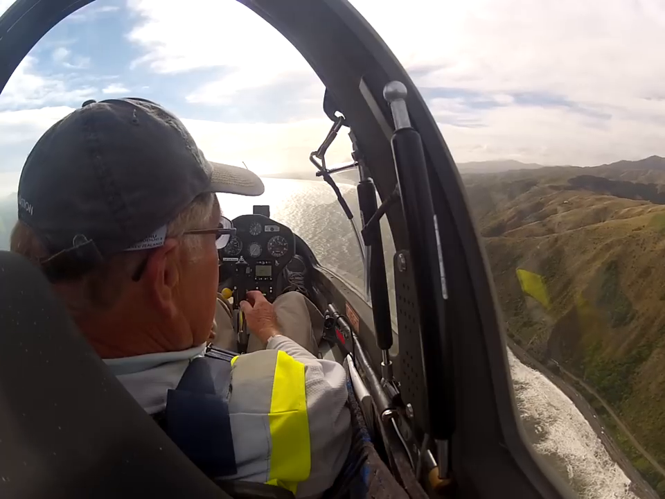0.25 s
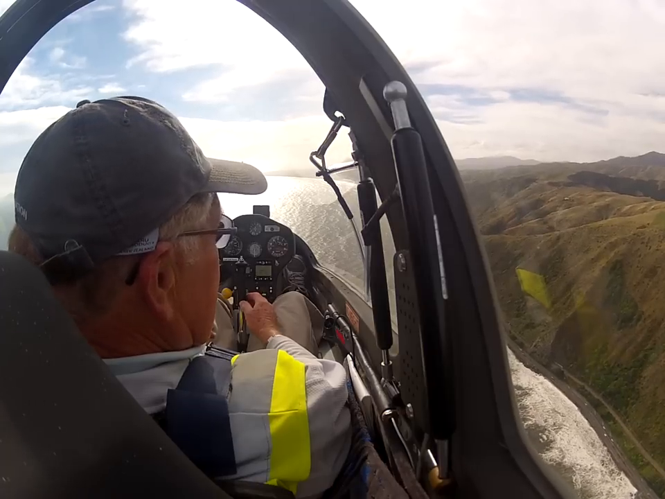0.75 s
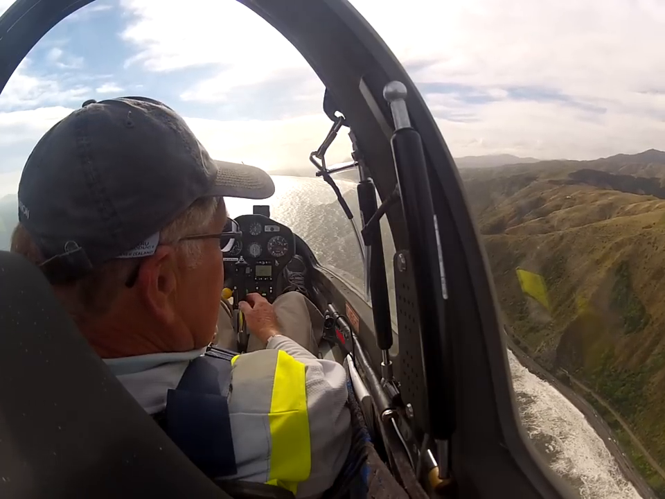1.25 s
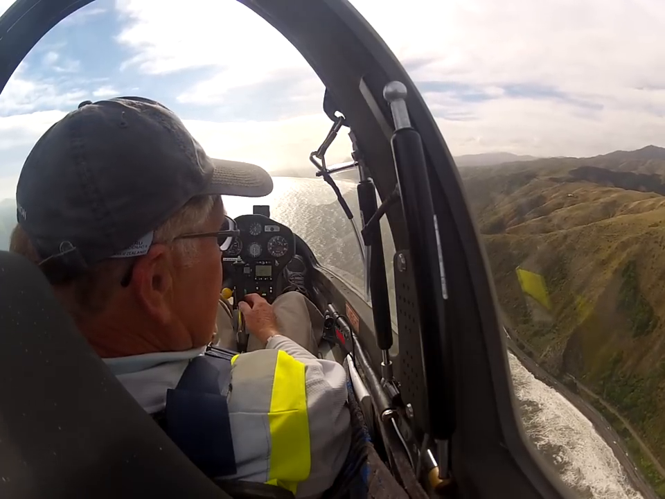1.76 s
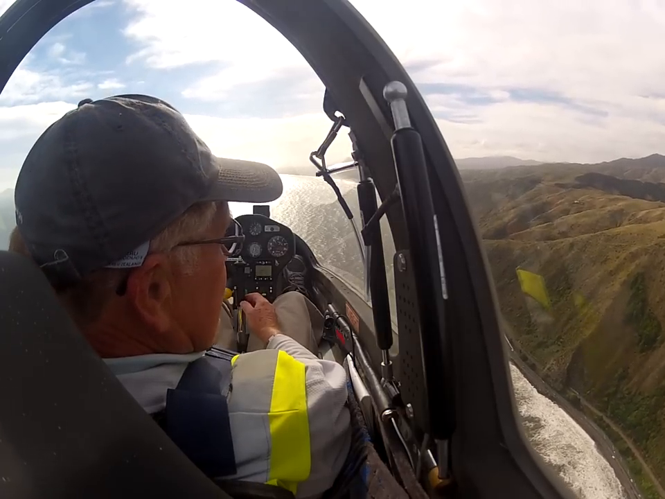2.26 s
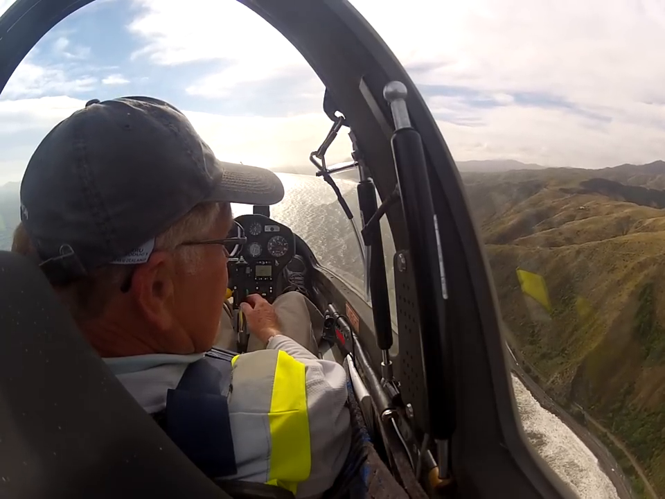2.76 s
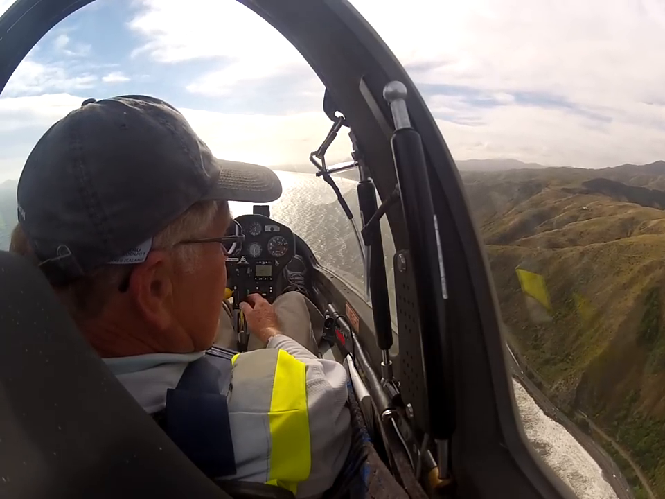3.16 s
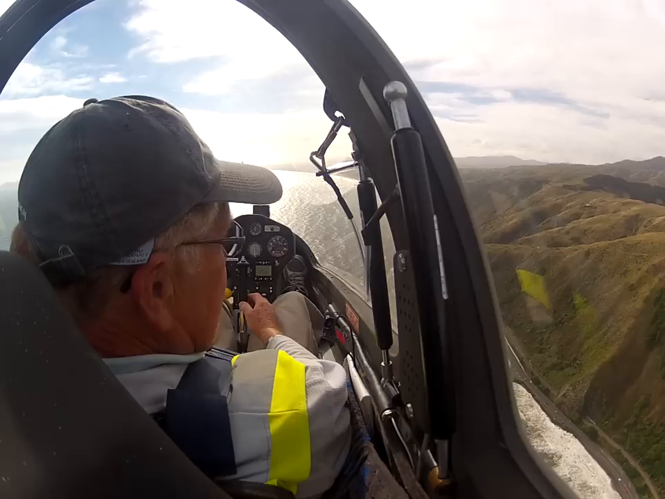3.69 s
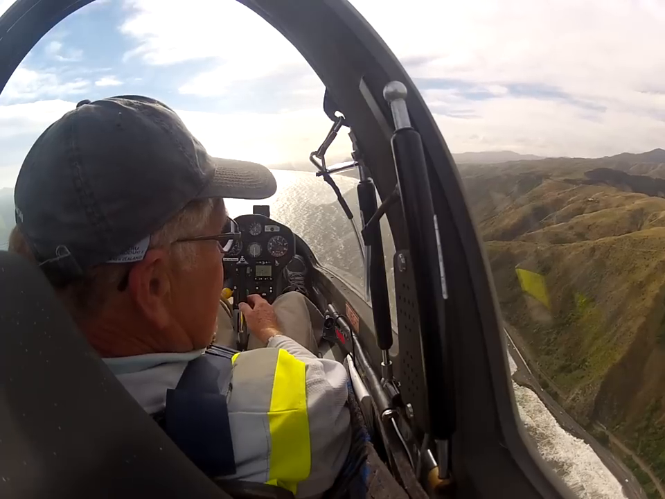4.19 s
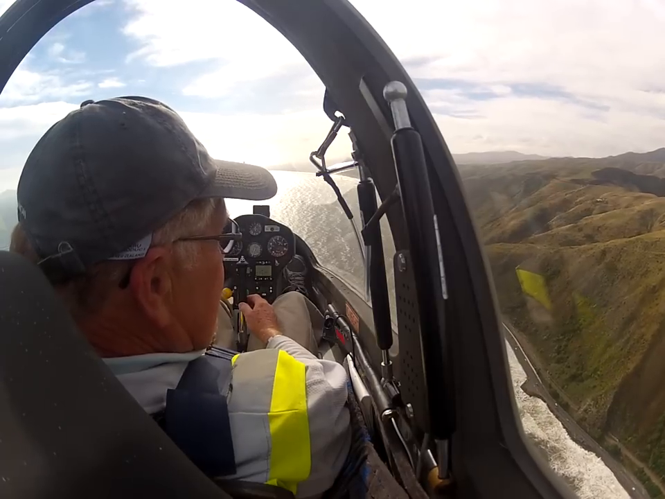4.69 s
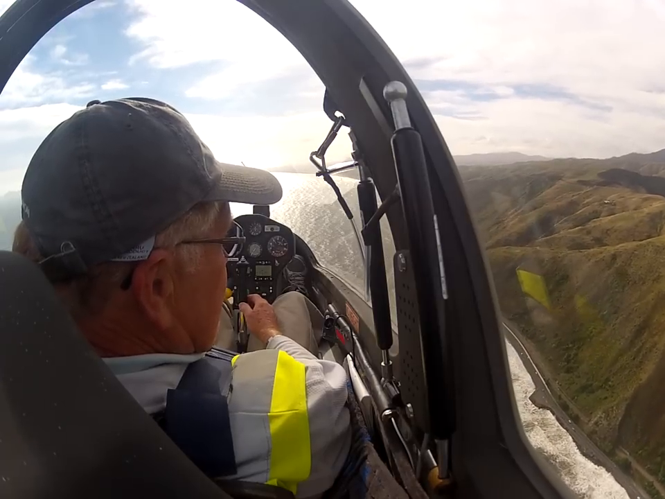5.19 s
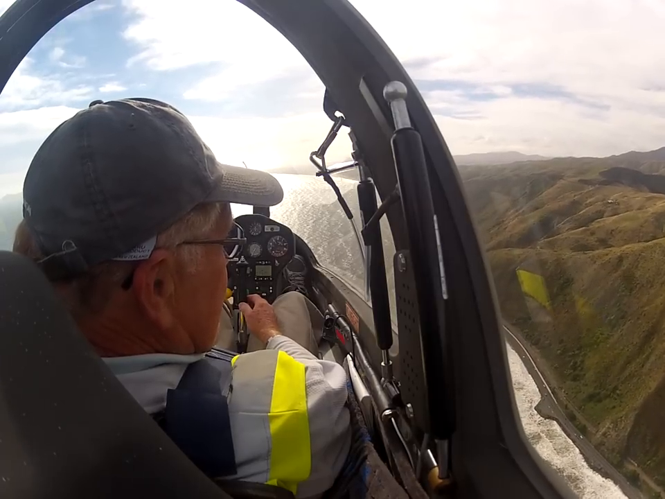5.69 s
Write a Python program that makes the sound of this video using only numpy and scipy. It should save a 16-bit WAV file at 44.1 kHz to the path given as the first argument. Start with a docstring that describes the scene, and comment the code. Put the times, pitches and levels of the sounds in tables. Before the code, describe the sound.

Loud, steady airflow rushes over a glider's canopy with a low buffeting boom, swelling slightly in gusts, heard inside the cockpit.

```python
"""A low, buffeting boom and a steady rush of air, heard inside the cockpit of a glider in flight.
Turbulence shakes the shell and the cabin air; the flow rings the canopy and hisses through its seals.
Gusts swell and fade, one of them with two faint crackles at its top. The microphone is a small
camera's, behind the pilot and close to overload; its low-rate sample hold adds a thin sizzle."""
import sys
import numpy as np
from scipy import signal
from scipy.fft import rfft, irfft
from scipy.io import wavfile
from scipy.ndimage import uniform_filter1d

SR = 44100
rng = np.random.default_rng(int(sys.argv[2]) if len(sys.argv) > 2 else 0)


def transcribe(u):
    """Save the signal u as a 16-bit wav file named by the first command-line argument.

    u: samples, shape (n,) or (channels, n), limited to [-1, 1]; the rate is SR.
    q: integer samples, one column per channel.
    """
    v = np.clip(np.atleast_2d(u).T, -1, 1)
    q = np.round(v * 32767).astype(np.int16)
    wavfile.write(sys.argv[1], SR, q)


N = 261954


def undb(db):
    """Decibels to gain."""
    return 10 ** (np.asarray(db) / 20)


def shaped_noise(gain):
    """Noise of rms 1, its spectrum shaped by a gain at each frequency."""
    x = irfft(rfft(rng.standard_normal(N)) * gain, N)
    return x / x.std()


def broad_noise(points):
    """Noise with a smooth spectrum through (Hz, relative dB) points."""
    hz, db = np.transpose(points)
    freqs = np.maximum(np.fft.rfftfreq(N, 1 / SR), 1)
    return shaped_noise(undb(np.interp(np.log(freqs), np.log(hz), db)))


def resonant_noise(peaks):
    """Noise ringing in steep-sided spectral peaks whose powers add."""
    freqs = np.maximum(np.fft.rfftfreq(N, 1 / SR), 1)
    power = 0
    for hz, width, db in peaks:
        detune = (freqs / hz - hz / freqs) * hz / width
        power += (undb(db) / (1 + (np.sqrt(2) - 1) * detune ** 2)) ** 2
    return shaped_noise(np.sqrt(power))


def steady(x, span_s):
    """Evens out swells longer than the span and keeps the quick flutter."""
    size = int(span_s * SR)
    local_power = uniform_filter1d(uniform_filter1d(x ** 2, size), size)
    return x / np.sqrt(local_power)


def wander(rate_hz):
    """A smoothed run of random levels, with a spread of 1."""
    step = int(SR / rate_hz)
    held = np.repeat(rng.standard_normal(N // step + 1), step)
    smooth = uniform_filter1d(uniform_filter1d(held, step), step)[:N]
    return smooth / smooth.std()


def gust_lifts():
    """Gusts swell and fade as bell curves; gives the lifts of boom, drone and rush in dB."""
    # Each row: peak time in seconds, length in seconds, then the lifts of boom, drone and rush in dB.
    gusts = [(0.273, .18, 4, -1.5, 2.5), (0.48, 0.27, 0.5, 3, 1.5), (0.92, 0.34, 1.5, 1, 1.4),
             (1.62, 0.49, 1.5, 4.5, 1.2), (2.083, 0.24, 4, 1, -0.5), (2.607, .16, 1, -1, 2),
             (2.775, 0.096, -3, 6.5, -0.5), (3.33, .3, 2.5, -1, 1), (3.86, 0.33, 3.5, -3, 0.5),
             (4.098, .2, -1, 3, -0.5), (4.52, .08, -3.5, 7, 0), (4.648, 0.15, 7, 0, 0.5),
             (5.61, 0.14, 6, 5, 0.5), (5.83, 0.17, 5.5, 0.5, 1)]
    t = np.arange(N) / SR
    return sum(np.outer(lifts_db, np.exp(-(2 * (t - peak_s) / length_s) ** 2))
               for peak_s, length_s, *lifts_db in gusts)


def crackles(half_length_s=0.0013):
    """Faint, dull bursts at the top of a gust, a few milliseconds each."""
    # The crackles. Each row: time in seconds, peak level in dB.
    peaks = [(5.596, -23), (5.641, -23)]
    # Their colour. Each row: frequency in Hz, relative spectral level in dB.
    tone = [(300, 4), (900, 7), (1600, 0), (3000, -11), (6000, -14)]
    t = np.arange(N) / SR
    bursts = sum(undb(db) * np.exp(-((t - peak_s) / half_length_s) ** 2) for peak_s, db in peaks)
    return bursts * broad_noise(tone)


def seal_leak(hiss_db=-34, ring_db=-43, flutter_db=0.31):
    """Air hisses through the canopy seals, with a faint ring from cabin reflections."""
    # The leaking air. Each row: frequency in Hz, relative spectral level in dB.
    hiss_spectrum = [(700, -29), (1250, -7.5), (1370, -11.5), (1700, -11.5), (1950, -9), (2620, -6),
                     (2800, -2), (3050, -2.5), (3400, -3.5), (4300, -9), (5000, -7), (5350, -10.5),
                     (5700, -18), (6000, -21.5)]
    # Narrow peaks in the hiss. Each row: frequency in Hz, width in Hz, relative level in dB.
    hiss_peaks = [(1950, 50, -6), (2105, 46, -5), (2183, 50, -6), (2477, 32, -4), (2887, 120, -0.5),
                  (3060, 60, -0.5), (3286, 50, -3), (4810, 56, -4.5), (4960, 80, -9)]
    hiss = broad_noise(hiss_spectrum) * undb(hiss_db)
    ring = resonant_noise(hiss_peaks) * undb(ring_db)
    return (hiss + ring) * undb(flutter_db * wander(rate_hz=22))


def turbulence_rumble(level_db=-23):
    """Broad turbulence lying under the resonances."""
    # The rumble. Each row: frequency in Hz, relative spectral level in dB.
    spectrum = [(8, -18), (20, -3), (30, -1), (44, 1), (60, -1), (130, 4), (215, 3), (400, -9.5), (700, -9),
                (1000, -37), (1600, -44), (3000, -65)]
    return broad_noise(spectrum) * undb(level_db)


def canopy_rush(lift_db, level_db=-19.5):
    """The flow overhead rings the canopy."""
    # Canopy modes. Each row: frequency in Hz, width in Hz, relative level in dB.
    canopy_modes = [(263, 15.6, 0), (304.5, 25.4, -0.5), (317.2, 32, 0.5), (372, 59, -5), (427.5, 55, -6),
                    (519, 41, -20.5), (533, 46, -6), (590, 28, -14.5), (707, 73, -19), (802, 76, -19.5),
                    (895, 80, -24.5), (1084, 95, -29.5)]
    return steady(resonant_noise(canopy_modes), span_s=0.17) * undb(level_db + lift_db)


def shell_drone(lift_db, level_db=-16.5):
    """Turbulent air sets the fuselage droning all around the microphone."""
    # Shell modes. Each row: frequency in Hz, width in Hz, relative level in dB.
    shell_modes = [(141.7, 13, -10), (151.8, 12.4, -7), (167.5, 7, 1), (182, 15, -12.5)]
    return steady(resonant_noise(shell_modes), span_s=0.14) * undb(level_db + lift_db)


def cabin_boom(lift_db, level_db=-12.5, buffet_db=1.5):
    """Gusts pump the cabin air into a boom that shakes with quick buffeting."""
    # Long air modes of the cabin. Each row: frequency in Hz, width in Hz, relative level in dB.
    air_modes = [(74.1, 5.1, -4.5), (84.2, 18, -8), (95.4, 10, -2), (105.7, 19.4, -6)]
    boom = steady(resonant_noise(air_modes), span_s=0.11)
    return boom * undb(level_db + lift_db + buffet_db * wander(rate_hz=35))


def scene():
    """Everything reaches one microphone behind the pilot."""
    boom_lift, drone_lift, rush_lift = gust_lifts()
    buffeting = cabin_boom(boom_lift) + shell_drone(drone_lift) + turbulence_rumble()
    slipstream = canopy_rush(rush_lift) + seal_leak()
    return (buffeting + slipstream + crackles())[None]


def record(dry, hold_hz=12000, top_hz=15250, knee=40):
    """The camera holds each sample, mirroring the sound around the hold rate; peaks at overload flatten."""
    slow = signal.resample(dry, round(N * hold_hz / SR), axis=-1)
    stairs = np.repeat(slow, 4, axis=-1)
    held = signal.resample(stairs, N, axis=-1)
    flattened = held / (1 + np.abs(held) ** knee) ** (1 / knee)
    steep_lowpass = signal.ellip(12, .1, 90, top_hz, fs=SR, output="sos")
    return signal.sosfilt(steep_lowpass, flattened)


dry = scene()
out = record(dry)
transcribe(out)
```